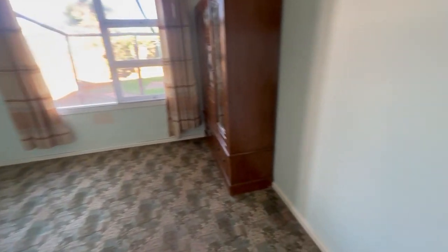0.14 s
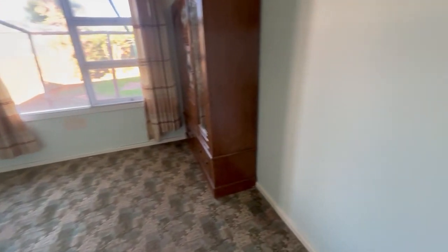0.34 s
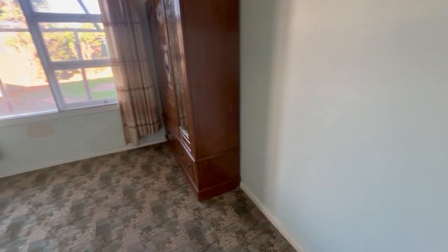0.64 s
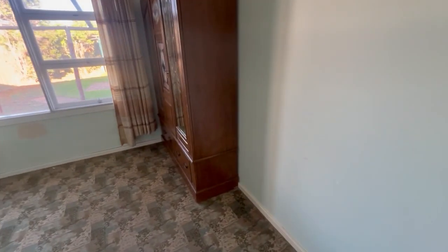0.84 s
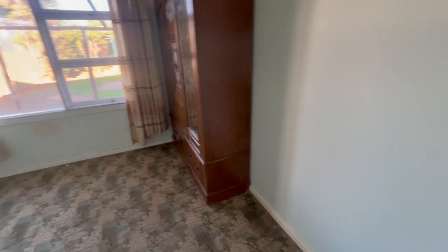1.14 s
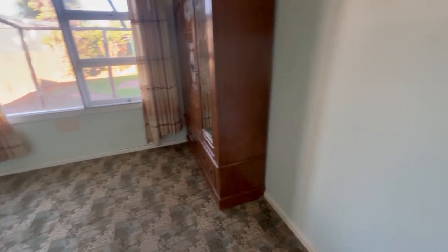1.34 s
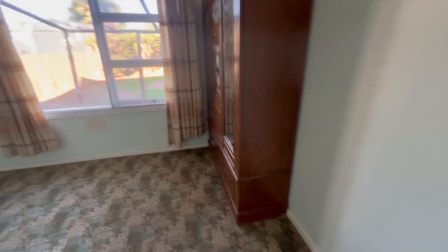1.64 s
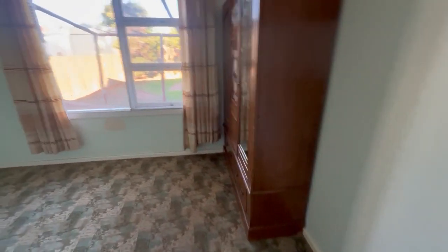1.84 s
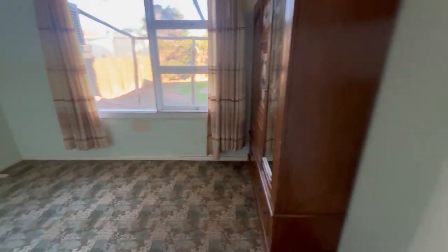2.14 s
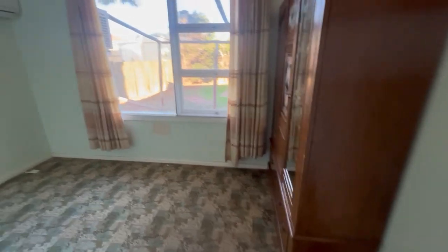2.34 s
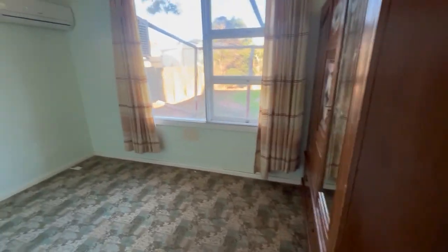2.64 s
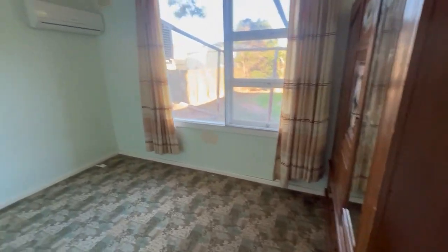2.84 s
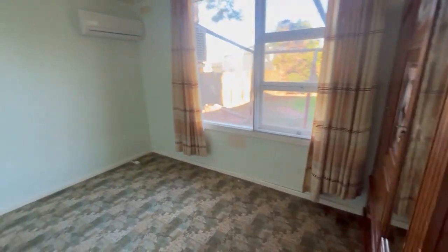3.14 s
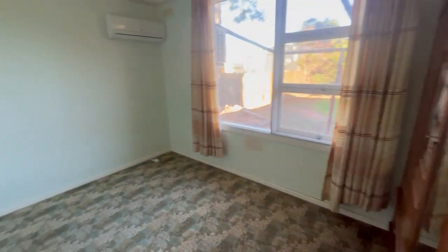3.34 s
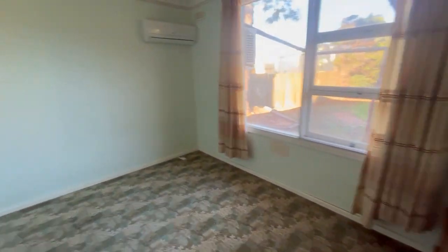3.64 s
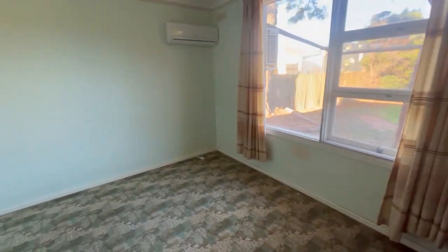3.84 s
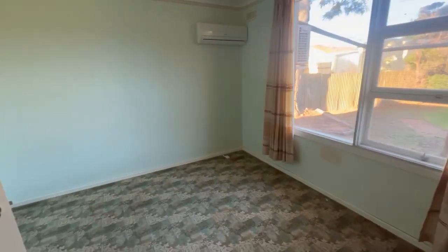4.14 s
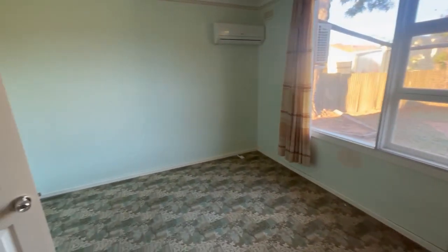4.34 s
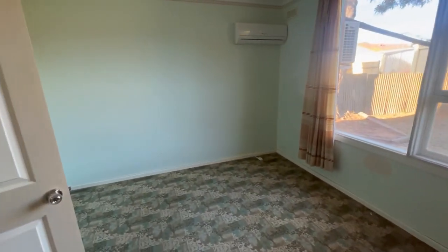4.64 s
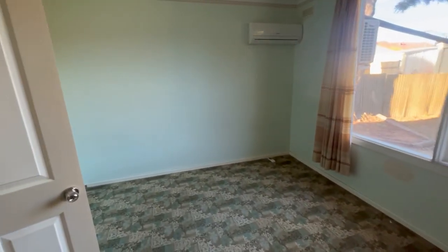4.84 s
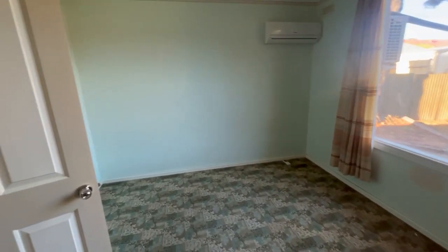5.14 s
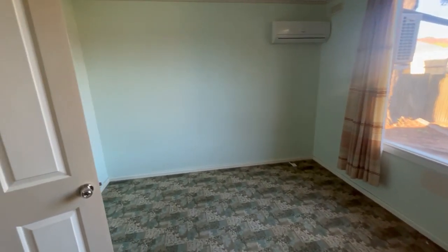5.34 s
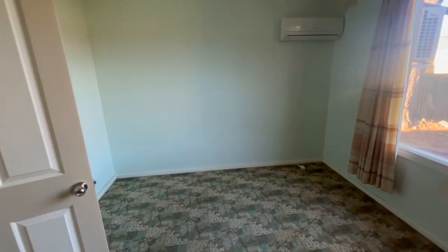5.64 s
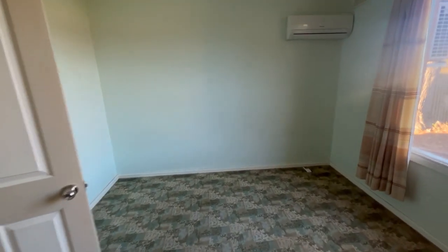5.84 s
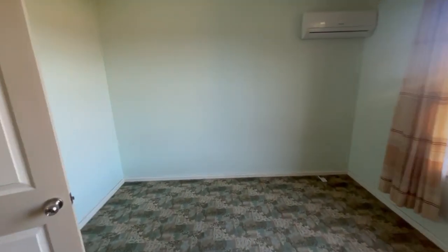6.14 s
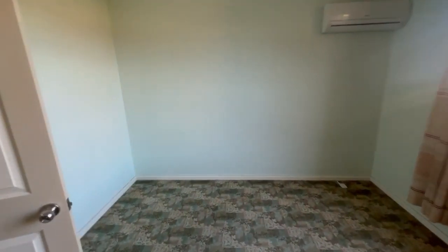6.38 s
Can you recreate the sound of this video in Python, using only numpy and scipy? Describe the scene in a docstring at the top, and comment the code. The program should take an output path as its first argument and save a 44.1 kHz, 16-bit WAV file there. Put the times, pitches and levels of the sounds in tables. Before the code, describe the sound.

Slow cushioned footfalls make boards knock and creak in an empty room, as fabric rustles over a low hum and one distant bird whistles early.

```python
"""Someone walks slowly into an empty, carpeted room with a handheld camera.
From the start clothes rustle over a low house murmur and a faint motor drone, both built from noise bands
and wavering tones, while one far bird whistles in short sweeps, mostly rising, one falling. Then boards slip
on their nails in dull pops and creaks, struck modes and noise that ring in the bare room. Short hollow rubs are
bursts of coloured noise, small bright cracks tick, many of them together with board slips, and soft footfalls
thud as slow, decaying swings of the floor."""
import sys
import numpy as np
from scipy import signal
from scipy.io import wavfile

SR = 44100
rng = np.random.default_rng(int(sys.argv[2]) if len(sys.argv) > 2 else 0)


def pcm_store(signal):
    """Save signal as 16-bit PCM."""
    levels = np.round(np.clip(np.atleast_2d(signal), -1, 1) * 32767)
    wavfile.write(sys.argv[1], SR, levels.astype(np.int16).T)


N = 287091
TIME = np.arange(N) / SR
RING_TIME = TIME[:SR * 3 // 4]   # time axis of one struck sound

# Strokes of cloth as arms and legs move; the swish is trimmed by 2.5 dB in the mix:
# start_s, attack_s, length_s (attack included), swish_db, rub_db, swish_tilt_db_per_octave
CLOTH_STROKES = [(0, 0.0013, 0.052, -75, -62, -6.5), (0.074, 0.022, 1, -101, -71.5, -3),
                 (0.946, 0.087, 0.17, -72.5, -65, 4.5), (1.14, 0.025, 0.11, -78.5, -73.5, 10),
                 (1.328, 0.046, 0.12, -81.5, -74, 10), (1.52, 0.02, 0.37, -69, -62.5, 0.5),
                 (1.9, 0.1, 0.45, -68.5, -67, -0.5), (2.326, 0.042, 0.25, -66.5, -61.5, 1.5),
                 (2.504, 0.068, 0.14, -61.5, -60.5, -1.5), (2.68, 0.037, 0.11, -72, -71.5, 0),
                 (2.81, 0.058, 0.26, -80, -78, 5), (2.91, 0.26, 0.44, -68.5, -66.5, -1),
                 (3.424, 0.044, 0.53, -82, -75, 1), (4.292, 0.012, .16, -70.5, -64.5, 3),
                 (4.534, .025, 0.05, -62.5, -57.5, -4), (4.651, 0.044, 0.14, -63.5, -62, -1.5),
                 (4.986, 0.075, 0.086, -73, -66, -2), (5.076, 0.025, 0.29, -76, -69.5, -1.5),
                 (5.285, 0.14, 0.24, -69.5, -64, -2.5), (5.53, 0.062, 0.22, -73, -77, 4.5),
                 (5.78, 0.1, 0.27, -75, -94, 1.5), (5.94, 0.055, 0.27, -71.5, -64, 1),
                 (6.089, 0.032, 0.18, -63.5, -59, -1), (6.297, 0.035, 0.12, -68.5, -72, 3)]
# Bright swish of fabric: pitch_hz, level_db_per_hz (relative)
SWISH_SPECTRUM = [(1000, -0.5), (2500, 4.5), (4500, 2.5), (6500, 3.5), (9000, 1), (12000, -1.5),
                  (15000, -31)]
# Lower rub of sleeves: pitch_hz, level_db_per_hz (relative)
RUB_SPECTRUM = [(300, -1.5), (600, 6.5), (900, 2), (1200, 5), (1800, -6), (2300, -3.5), (3500, -37),
                (7000, -24)]
# Hollow colour of rubbing sleeves: pitch_hz, width_hz, level_db
RUB_RESONANCES = [(750, 86, -4.5), (1170, 74, -7), (1650, 400, -10.5)]
# Stereo lean of cloth, hollow rubs and tick hiss: pitch_hz, left_minus_right_db
CLOTH_LEAN = [(500, 1.5), (2000, -4), (4000, -9), (8000, -6), (12000, 5.5)]
# House murmur: pitch_hz, level_db_per_hz (relative)
MURMUR_SPECTRUM = [(20, -33), (33, -16.5), (58, 11.5), (88, -10), (125, 1.5), (200, -7.5), (310, -1.5),
                   (420, -9), (650, -14), (1200, -26), (2500, -37.5), (6000, -43.5), (15000, -44.5)]
# Loudness curve of the murmur: time_s, level_db
MURMUR_LEVEL = [(0, -62), (1.4, -64.5), (2.9, -65), (3.8, -67), (5.1, -62), (5.8, -65.5), (6.51, -64.5)]
# Stereo lean of the murmur: pitch_hz, left_minus_right_db
MURMUR_LEAN = [(50, 0.5), (300, 3), (4000, -9)]
# Lines of the motor drone: pitch_hz, level_db (relative to the drone level, before muffling)
DRONE_LINES = [(66.6, -5.5), (133.2, -5.5), (166.5, -7.5), (199.8, -12.5), (222, -7), (266.4, -8.5),
               (324, -7.5), (466, -7)]
# The drone is left behind and ends duller: time_s, level_db, muffle_hz (dull above this)
DRONE_LEVEL = [(0, -58, 497), (.65, -58.5, 750), (1.4, -59, 506), (2.9, -58.5, 338), (3.7, -62, 330),
               (5, -59.5, 318), (6.51, -58.5, 317)]
# Bird whistles, before flicker and waver: start_s, length_s, first_hz, end_hz, level_db
BIRD_WHISTLES = [(0.125, 0.16, 3150, 3350, -86), (0.499, 0.2, 3320, 3710, -89),
                 (0.602, 0.07, 4260, 4100, -86), (0.683, 0.154, 3810, 3850, -80)]
# Boards slipping on their nails, alone as a pop or in a close run as a creak:
# start_s, knock_db, boom_db, edge_hz (knock dull above this), squeak_hz (shifts with the load)
BOARD_SLIPS = [(.743, -49, -48, 1510, 840), (.761, -50.5, -67, 970, 880), (1.023, -56.5, -53, 2570, 1030),
               (1.662, -48, -71, 2190, 960), (1.683, -47.5, -35, 1180, 970), (1.731, -45.5, -70, 2580, 970),
               (1.749, -43.5, -67, 2100, 974), (1.778, -44, -43, 1490, 900), (1.828, -45.5, -37, 1370, 788),
               (2.008, -40, -36.5, 1320, 574), (2.071, -43, -47, 1900, 674),
               (2.131, -42.5, -43.5, 2100, 712), (2.180, -40.5, -31, 1850, 715),
               (2.215, -43, -38.5, 1920, 700), (2.245, -41.5, -52, 1880, 705),
               (2.274, -44.5, -38, 1840, 670), (2.306, -42.5, -38, 1750, 617),
               (2.331, -40, -30.5, 2100, 540), (2.351, -62, -32, 1300, 800), (2.363, -51, -65, 3430, 1210),
               (2.39, -41, -31, 1130, 1206), (2.433, -51.5, -50, 1500, 800), (3.147, -47.5, -45, 560, 388),
               (3.161, -46.5, -42, 1250, 552), (3.178, -49, -35.5, 1350, 750), (3.194, -48, -55, 1090, 506),
               (3.212, -49.5, -37, 1250, 536), (3.236, -47, -43.5, 1340, 500),
               (3.258, -43.5, -46, 1400, 1160), (3.284, -47, -38, 1090, 550), (3.309, -46, -40, 1110, 552),
               (3.35, -47, -35, 1260, 390), (3.406, -45.5, -44, 1330, 630), (3.437, -59, -54, 900, 770),
               (3.901, -39, -34, 1570, 743), (4.044, -43, -36, 1330, 690), (4.303, -37, -33, 1580, 638),
               (4.323, -45, -47, 1010, 880), (4.376, -45.5, -28.5, 1040, 730),
               (6.12, -41.5, -35.5, 1950, 793), (6.139, -44, -43, 1200, 750),
               (6.197, -49.5, -64, 1250, 650)]
# Where the weight rests: from_s, boom_hz (pitch the floor favours), favour_db, stiff_hz (floor too stiff below),
# node_hz (missing from the room here), board_db, clack_hz, clack_db, squeak_db, joist_db (lift of the deepest mode)
FLOOR_SPOTS = [(0, 257, 3, 190, 560, -16, 1850, -19, -4, -10),
               (1.6, 180, 6, 115, 635, -14, 1720, -7, -2, -6),
               (1.72, 190, 2, 115, 656, -12, 1780, 0, 2, -17),
               (1.77, 190, 3.5, 114, 676, -22, 1650, -8, -0.5, -14),
               (1.95, 381, -5.5, 132, 455, -10, 1440, -12, 2.5, -26),
               (2.05, 385, 6, 152, 467, -6.5, 1474, -4.5, 5.5, -2),
               (2.32, 142, 10.5, 94, 470, -12, 1460, -6, 4, -20),
               (2.38, 269, 6, 91.5, 710, -23, 1240, -11, 4.5, -19),
               (3.1, 250, 1.5, 113, 900, -25, 1230, -15, 0.5, -14.5),
               (3.85, 167, 11, 83, 1180, -3, 1560, -0.5, -6, -6),
               (4.0, 322, 17, 80, 1170, -5, 1560, 0, -5, 2),
               (4.25, 309.7, 20.5, 65.6, 1184, -7.5, 1500, -6.5, -3, 0.5),
               (6.0, 260, 3.5, 159, 543, -15, 1590, -4, 3.5, -12)]
# Deep modes of the floor: pitch_hz, level_db, t60_s
FLOOR_MODES = [(105, -0.5, 0.44), (139.14, -10, 0.51), (167.7, -4, 0.31), (197.4, -9, 0.34),
               (256.6, -0.5, 0.34), (322, -13.5, 0.47), (382.8, -8.5, 0.6), (473, -17.5, 0.45),
               (552, -22, 0.26), (604, -15, 0.13)]
# Woody ring of the boards: pitch_hz, level_db, t60_s
BOARD_MODES = [(656, -5, 0.24), (750, -2.5, 0.23), (900, -6, 0.28), (1208, -14.5, 0.27), (1330, -6, 0.33),
               (1720, -11, 0.18), (2377, -8, 0.19)]
# A board's knock through the carpet: pitch_hz, level_db_per_hz (relative)
KNOCK_SPECTRUM = [(50, 10), (100, 3.5), (170, 6.5), (300, 2.5), (480, 0), (700, 1), (950, -2.5),
                  (1200, -3.5), (1600, -8), (2100, -11.5), (3500, -12.5), (7000, -24.5), (14000, -31)]
# Stereo lean of knocks and tick cracks: pitch_hz, left_minus_right_db
KNOCK_LEAN = [(100, -3), (500, -1.5), (1000, -3), (2000, -1.5), (4000, -7.5), (8000, -23.5), (12000, 16)]
# Standing waves that every knock wakes: pitch_hz, width_hz, level_db
ROOM_RESONANCES = [(142.7, 8.5, -4), (256, 19, -6), (318.5, 24, -2), (381, 15, -8), (548, 9.3, -2.5),
                   (710, 12, -10.5), (912, 26, -3), (1192, 25, -8)]
# Ring time of the bare room: pitch_hz, t60_s
ROOM_T60 = [(80, 0.67), (250, 0.68), (700, 0.37), (1800, 0.31), (5000, 0.32), (14000, 0.083)]
# Short mid-pitched, hollow rubs: start_s, attack_s, length_s (attack included), level_db
HOLLOW_RUBS = [(1.014, .005, 0.027, -64.5), (1.532, .004, 0.022, -73), (2.567, .012, .04, -68),
               (4.536, .012, 0.045, -68), (4.696, .02, 0.072, -70), (5.048, 0.091, 0.19, -66.5),
               (5.36, 0.059, 0.16, -74), (6.32, 0.037, 0.16, -71.5)]
# Rasp of the hollow rubs: pitch_hz, level_db_per_hz (relative)
HOLLOW_RUB_SPECTRUM = [(400, -25), (850, -6), (1150, 6), (1700, -5), (2200, -0.5), (2800, -24), (6000, -23),
                       (14000, -42)]
# Hollow colour of the rasp: pitch_hz, width_hz, level_db
HOLLOW_RUB_RESONANCES = [(1120, 130, 0), (1660, 200, -13), (2240, 220, -5)]
# Dry ticks and cracks: start_s, crack_db, hiss_db
TICK_EVENTS = [(1.024, -74, -82), (1.537, -73.5, -82), (1.662, -68, -63), (1.731, -51.5, -68),
               (2.333, -60, -69), (2.363, -47, -59.5), (2.582, -58.5, -61), (3.25, -59, -68.5),
               (3.902, -62, -89), (4.305, -60, -66.5), (4.55, -77, -73), (4.618, -66.5, -65),
               (5.385, -84, -69), (6.122, -83, -63.5), (6.2, -62.5, -62)]
# Crack of a tick: pitch_hz, level_db_per_hz (relative)
TICK_SPECTRUM = [(300, 3), (1200, 14.5), (2200, 6.5), (3500, 6.5), (6000, -8), (9000, -17), (14000, -42)]
# Ring of ticks and cloth crackles: pitch_hz, width_hz, level_db
TICK_RESONANCES = [(970, 31, -18), (1560, 85, 0), (2355, 34, 8.5), (3020, 50, -2), (3040, 61, -8.5),
                   (5070, 200, -6.5)]
# Soft footfalls: start_s, level_db, sag_hz (floor sags and springs back), swell_s (to the deepest swing)
FOOTFALL_EVENTS = [(1.555, -46, 57, .035), (2.328, -44, 60, 0.045), (2.529, -44.5, 59, .03),
                   (3.251, -50, 65, 0.055), (4.306, -49, 70.3, .04), (4.558, -46, 41, 0.049),
                   (4.625, -39.5, 62.6, 0.033), (4.695, -42, 88, 0.023), (5.095, -48.5, 59.3, 0.037),
                   (5.169, -51, 52.6, 0.028), (5.78, -57, 43.6, 0.041), (5.985, -50, 61.5, 0.027),
                   (6.166, -53, 44.5, 0.074)]
# Left-right correlation of all banded noise: pitch_hz, correlation (-1 to 1)
LIKENESS = [(40, 0.94), (130, 0.45), (280, 0.69), (500, -0.086), (1000, -0.014), (4000, 0.0098),
            (12000, 0.16)]
# Narrow dips in the microphone's response: pitch_hz, width_hz, depth_db
MIC_DIPS = [(5350, 165, -22), (7550, 730, -17), (10160, 2150, -20)]

CLOTH_RELEASE_S = 0.059   # time constant of a stroke's fade
STILL_SWISH_DB, STILL_RUB_DB, STILL_TILT_DB = -83.5, -80, 1   # the clothes are never quite still
BIRD_WAVER_HZ = 45
CLACK_SPLIT_HZ, CLACK_T60_S = 126, 0.03   # a hollow clack is a close pair of short modes
CUTOFF_HZ = 13250


def from_db(db):
    """Decibels to a linear gain."""
    return 10 ** (np.asarray(db) / 20)


def rms_one(x):
    """Scale a sound to an RMS level of 1."""
    return x / np.sqrt(np.mean(x ** 2) + 1e-20)


def in_time(rows):
    """Read each column of a curve at every sample."""
    s, *columns = np.transpose(rows)
    return [np.interp(TIME, s, column) for column in columns]


def at_hz(points, hz):
    """Read a spectrum on a log-frequency axis."""
    point_hz, values = np.array(points).T
    return np.interp(np.log(hz), np.log(point_hz), values)


def drift(rate):
    """Random wandering with RMS 1, joining this many chance values per second by straight lines."""
    knots = rng.standard_normal(4096)
    return rms_one(np.interp(TIME * rate, np.arange(len(knots)), knots))


def add(out, s, sound):
    """Mix a sound in at time s."""
    at = round(s * SR)
    out[..., at:at + sound.shape[-1]] += sound[..., :N - at]


def low_pass(x, hz, order=2):
    """Dull a sound above hz."""
    return signal.sosfilt(signal.butter(order, hz, fs=SR, output="sos"), x)


def high_pass(x, hz):
    """Thin a sound out below hz."""
    return signal.sosfilt(signal.butter(2, hz, "high", fs=SR, output="sos"), x)


def resonance(x, hz, width_hz):
    """One resonance with gain 1 on top."""
    r = np.exp(-np.pi * width_hz / SR)
    zeros = np.array([1, 0, -1]) * (1 - r * r) / 2
    poles = [1, -2 * r * np.cos(2 * np.pi * hz / SR), r * r]
    return signal.lfilter(zeros, poles, x)


def coloured(x, resonances):
    """A sound with resonances standing out of it."""
    return x + sum(from_db(db) * resonance(x, hz, width_hz) for hz, width_hz, db in resonances)


def ring(modes, rise_s, skew_s):
    """Struck modes swell briefly and reach the two microphones slightly out of step."""
    out = 0
    for k, (hz, db, t60) in enumerate(modes):
        sign = (-1) ** k
        offset_s = sign * skew_s * np.array([[1], [-1]])
        decay = from_db(db - 60 * RING_TIME / t60)
        out = out + sign * decay * np.sin(2 * np.pi * hz * (RING_TIME + offset_s))
    return out * (1 - np.exp(-RING_TIME / rise_s))


def banded_noise(spectrum, lean, envelope, size):
    """Third-octave bands of stereo noise, each under its own envelope(hz)."""
    edges = 18 * 2 ** (np.arange(31) / 3)
    settle = 4096   # samples for the filters to settle
    white = rng.standard_normal((3, 2, size + settle))
    out, power = 0, 0
    for k, (low, high) in enumerate(zip(edges, edges[1:])):
        hz = np.sqrt(low * high)
        band_filter = signal.butter(2, [low, high], "band", fs=SR, output="sos")
        mid, side = signal.sosfilt(band_filter, white[k % len(white)])[:, settle:]
        shape = envelope(hz)
        alike = at_hz(LIKENESS, hz)
        common = np.sqrt(1 + alike) * rms_one(mid * shape)
        opposed = np.sqrt(1 - alike) * rms_one(side * shape) * [[1], [-1]]
        gain = from_db(at_hz(spectrum, hz)) * np.sqrt(high - low)
        balance = from_db(at_hz(lean, hz) * np.array([[.5], [-.5]]))
        out = out + (common + opposed) * gain * np.sqrt(np.mean(shape ** 2)) * balance
        power += gain ** 2
    return out / np.sqrt(power)


def room_response(spectrum, direct_db, direct_s, build_cycles, rise_s):
    """A short direct crack, then dense reflections; the lows build up later and last longer than the top."""
    def envelope(hz):
        tail = from_db(-60 * RING_TIME / at_hz(ROOM_T60, hz))
        crack = from_db(direct_db) * np.exp(-RING_TIME / direct_s)
        return (tail + crack) * (1 - np.exp(-RING_TIME / (rise_s + build_cycles / hz)))
    return banded_noise(spectrum, KNOCK_LEAN, envelope, len(RING_TIME))


def stroke_shape(s, attack_s, length_s, release_s):
    """A rubbing stroke swells, holds and dies away."""
    swell = np.clip((TIME - s) / attack_s, 0, 1)
    return swell * np.exp(-np.maximum(TIME - s - length_s, 0) / release_s)


def cloth_motion():
    """Strokes add in power to the still cloth: gain of the swish, gain of the rub, tilt of the swish."""
    swish, rub = from_db(STILL_SWISH_DB) ** 2, from_db(STILL_RUB_DB) ** 2
    tilt = STILL_TILT_DB * swish
    for s, attack_s, length_s, swish_db, rub_db, tilt_db in CLOTH_STROKES:
        shape = stroke_shape(s, attack_s, length_s, CLOTH_RELEASE_S)
        swish_power = (from_db(swish_db) * shape) ** 2
        swish = swish + swish_power
        rub = rub + (from_db(rub_db) * shape) ** 2
        tilt = tilt + tilt_db * swish_power
    return np.sqrt(swish), np.sqrt(rub), tilt / swish


def clothes(swish_gain, rub_gain, tilt_db, grain_db, grain_rate, patchy_db):
    """Fabric slides over fabric, catching and letting go; its folds keep changing the colour."""
    def folds(hz):
        return from_db(patchy_db * drift(35)) if hz > 500 else 1

    def tilted(hz):
        return folds(hz) * from_db(tilt_db * np.log2(hz / 6000)) if hz > 1500 else 1

    swish = banded_noise(SWISH_SPECTRUM, CLOTH_LEAN, tilted, N)
    swish = swish_gain * from_db(grain_db * drift(grain_rate)) * swish
    rub = rms_one(coloured(banded_noise(RUB_SPECTRUM, CLOTH_LEAN, folds, N), RUB_RESONANCES))
    rub = rub_gain * from_db(grain_db * drift(grain_rate)) * rub
    return from_db(-2.5) * swish + rub


def snags(per_s, level_db, spread_db):
    """Threads and seams catch at random while the sleeves rub, each with a tiny crackle."""
    caught = rng.random(N) < per_s / SR
    sizes = from_db(spread_db * np.minimum(rng.exponential(1, N), 3)) * caught
    clicks = sizes * rng.standard_normal((2, N)) + 1e-18
    crackle = 0
    for hz, width_hz, db in TICK_RESONANCES:
        crackle = crackle + from_db(db) * resonance(clicks, hz, 5 * width_hz) / np.sqrt(hz)
    return from_db(level_db) * rms_one(crackle) * from_db([[-1.5], [1.5]])


def house(waver_share, flutter_db, hum_hz, hum_width_hz, hum_db):
    """A low murmur, and a motor droning through the walls in faint wavering lines with a soft, airy hum."""
    out = from_db(in_time(MURMUR_LEVEL)[0]) * banded_noise(MURMUR_SPECTRUM, MURMUR_LEAN, lambda hz: 1, N)
    level_db, muffle_hz = in_time(DRONE_LEVEL)

    def heard(hz, db):
        return from_db(level_db + db) / np.hypot(1, (hz / muffle_hz) ** 4)

    for hz, db in DRONE_LINES:
        phase = 2 * np.pi * np.cumsum(hz * (1 + waver_share * drift(25))) / SR
        skew = hz / 600 * drift(1.55) * np.array([[1], [-1]])   # the camera moves through standing waves
        out = out + heard(hz, db + flutter_db * drift(24)) * np.sin(phase + skew)
    hum = rng.standard_normal((2, N))
    for _ in range(2):
        hum = resonance(hum, hum_hz, hum_width_hz)
    return out + heard(hum_hz, hum_db) * rms_one(hum)


def bird(flicker_db, echo_s):
    """Far whistles bend towards an end pitch and reach the room as a patchy blur of echoes."""
    song = np.zeros(N)
    for s, length_s, first_hz, end_hz, db in BIRD_WHISTLES:
        along = np.clip((TIME - s) / length_s, 0, 1)
        hz = end_hz + (first_hz - end_hz) * (1 - along) ** 2
        swell = 2 * np.sqrt(along * (1 - along))
        level = from_db(db + flicker_db * drift(41.1))
        phase = 2 * np.pi * np.cumsum(hz + BIRD_WAVER_HZ * drift(500)) / SR
        song += swell * level * np.sin(phase)
    echoes = rng.standard_normal((2, len(RING_TIME))) * np.exp(-RING_TIME / echo_s)
    echoes = echoes / np.sqrt(np.sum(echoes ** 2, axis=1, keepdims=True))
    return signal.fftconvolve(song[None], echoes, axes=1)[:, :N]


def floor_boom(centre_hz, favour_db, joist_db, width_octaves):
    """The foot's place favours floor modes near one pitch and sets how far the joists' deepest mode swings."""
    modes = []
    for k, (hz, db, t60) in enumerate(FLOOR_MODES):
        nearness = np.exp(-(np.log2(hz / centre_hz) / width_octaves) ** 2)
        lift_db = favour_db * (nearness - .5) + joist_db * (k == 0)
        modes.append((hz, db + lift_db, t60))
    return ring(modes, rise_s=0.018, skew_s=.0001)


def board_clack(room, clack_hz, room_db):
    """A board's hollow clack: two close modes, with the room answering around them."""
    pair = [(clack_hz + side * CLACK_SPLIT_HZ / 2, 0, CLACK_T60_S) for side in (-1, 1)]
    direct = ring(pair, rise_s=0.00068, skew_s=.00007) * from_db([[-1.5], [1.5]])
    return direct + from_db(room_db) * resonance(room, clack_hz, 2 * CLACK_SPLIT_HZ)


def floorboards(own_share, squeak_t60, node_depth, node_width_share, clack_room_db):
    """Each slip rings its board, fills the room and sets the whole floor booming; slips at one spot sound alike."""
    out = np.zeros((2, N))
    paths = []
    for _ in range(8):
        path = room_response(KNOCK_SPECTRUM, direct_db=-11, direct_s=0.0069, build_cycles=0.6, rise_s=0.0005)
        paths.append(coloured(path, ROOM_RESONANCES))
    board = ring(BOARD_MODES, rise_s=0.0017, skew_s=.0001)
    for k, (s, knock_db, boom_db, edge_hz, squeak_hz) in enumerate(BOARD_SLIPS):
        spot = max(sum(row[0] <= s for row in FLOOR_SPOTS) - 1, 0)
        (_, boom_hz, favour_db, stiff_hz, node_hz,
         board_db, clack_hz, clack_db, squeak_db, joist_db) = FLOOR_SPOTS[spot]
        # the spot's shared path, plus a share that changes from slip to slip
        other = spot + 1 + k % (len(paths) - 1)
        room = np.sqrt(1 - own_share) * paths[spot % len(paths)] + np.sqrt(own_share) * paths[other % len(paths)]
        room = room - node_depth * resonance(room, node_hz, node_width_share * node_hz)
        clack = board_clack(room, clack_hz, clack_room_db)
        squeak = ring([(squeak_hz, squeak_db, squeak_t60)], rise_s=0.000071, skew_s=0.000085)
        knock = low_pass(room + squeak + from_db(board_db) * board, edge_hz, order=3)
        knock = knock + from_db(clack_db) * clack
        boom = floor_boom(boom_hz, favour_db, joist_db, width_octaves=0.11)
        add(out, s, high_pass(from_db(knock_db) * knock + from_db(boom_db) * boom, stiff_hz))
    return out


def hollow_rubs(release_s, grain_db, grain_rate):
    """Short, hollow rubs: grainy noise, strongest from 1 to 2.4 kHz, swells and dies away."""
    gain = 0
    for s, attack_s, length_s, db in HOLLOW_RUBS:
        gain = gain + from_db(db) * stroke_shape(s, attack_s, length_s, release_s)
    rasp = banded_noise(HOLLOW_RUB_SPECTRUM, CLOTH_LEAN, lambda hz: 1, N)
    rasp = rms_one(coloured(rasp, HOLLOW_RUB_RESONANCES))
    return gain * from_db(grain_db * drift(grain_rate)) * rasp


def ticks(hiss_s, snap_db, snap_s):
    """Small, bright cracks with a brief ring, a sharp snap that trails into hiss and little weight behind them."""
    def snap_then_hiss(hz):
        return np.exp(-RING_TIME / hiss_s) + from_db(snap_db) * np.exp(-RING_TIME / snap_s)

    out = np.zeros((2, N))
    cracks = []
    for _ in range(3):
        crack = room_response(TICK_SPECTRUM, direct_db=-6.5, direct_s=0.011, build_cycles=0.56, rise_s=0.00072)
        cracks.append(coloured(crack, TICK_RESONANCES))
    hiss = banded_noise(SWISH_SPECTRUM, CLOTH_LEAN, snap_then_hiss, len(RING_TIME))
    for k, (s, crack_db, hiss_db) in enumerate(TICK_EVENTS):
        add(out, s, from_db(crack_db) * cracks[k % len(cracks)] + from_db(hiss_db) * hiss)
    return out


def footfalls(boom_db, soft_hz):
    """A cushioned foot pushes the floor into a few slow swings and faintly stirs its modes."""
    out = np.zeros((2, N))
    boom = from_db(boom_db) * low_pass(ring(FLOOR_MODES, rise_s=0.021, skew_s=.0001), soft_hz)
    for s, db, sag_hz, swell_s in FOOTFALL_EVENTS:
        push = (RING_TIME / swell_s * np.exp(1 - RING_TIME / swell_s)) ** 2
        swing = push * np.sin(2 * np.pi * sag_hz * RING_TIME)
        add(out, s, from_db(db) * (swing + boom))
    return out


def scene():
    """Mix clothes, boards, rubs, cracks and feet with the house and the bird."""
    swish, rub, tilt_db = cloth_motion()
    fabric = clothes(swish, rub, tilt_db, grain_db=0.62, grain_rate=96, patchy_db=2.0)
    fabric = fabric + rub * snags(per_s=150, level_db=-23.0, spread_db=6.5)
    background = house(waver_share=0.00713, flutter_db=3.0, hum_hz=462.5, hum_width_hz=50, hum_db=-5.5)
    background = background + bird(flicker_db=4, echo_s=0.016)
    boards = floorboards(own_share=0.26, squeak_t60=0.058, node_depth=1.0, node_width_share=0.067, clack_room_db=0.5)
    rubs = hollow_rubs(release_s=0.047, grain_db=1, grain_rate=140)
    cracks = ticks(hiss_s=0.048, snap_db=8.5, snap_s=0.0012)
    feet = footfalls(boom_db=-10, soft_hz=200)
    return fabric + background + boards + rubs + cracks + feet


def record(dry):
    """The microphone takes narrow dips out of the treble, and the top is cut steeply."""
    for hz, width_hz, depth_db in MIC_DIPS:
        dry = dry - (1 - from_db(depth_db)) * resonance(dry, hz, width_hz)
    return signal.sosfilt(signal.ellip(10, .1, 70, CUTOFF_HZ, fs=SR, output="sos"), dry)


dry = scene()
out = record(dry)
pcm_store(out)
```